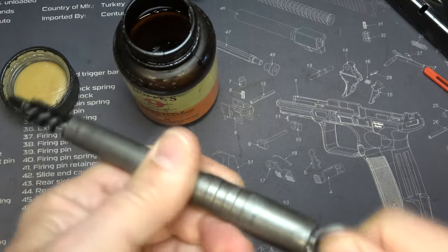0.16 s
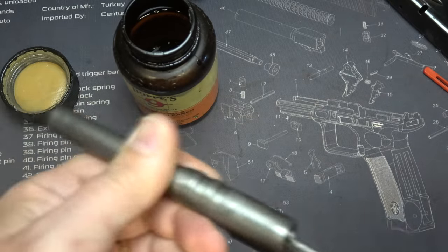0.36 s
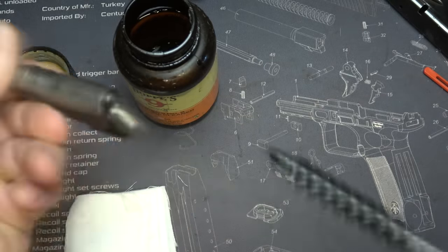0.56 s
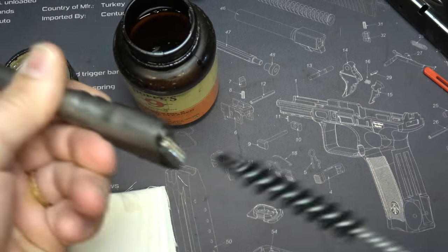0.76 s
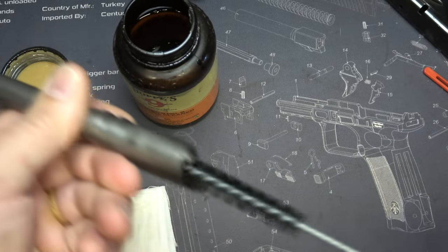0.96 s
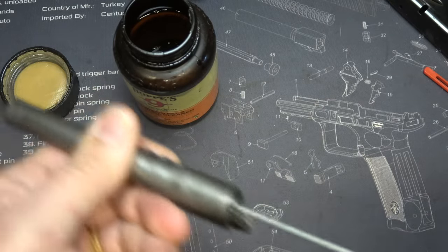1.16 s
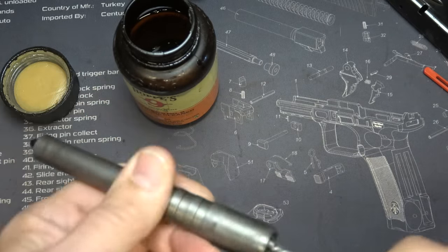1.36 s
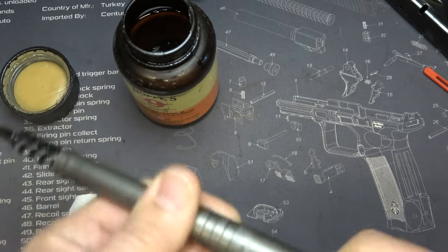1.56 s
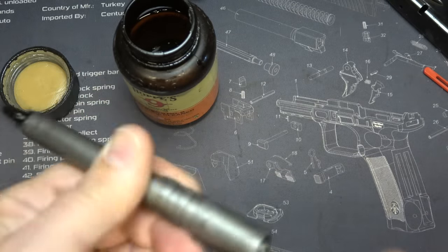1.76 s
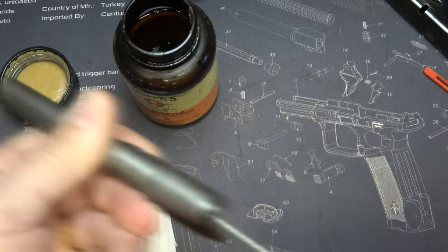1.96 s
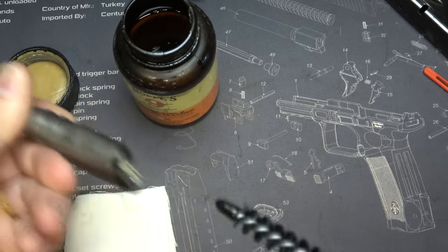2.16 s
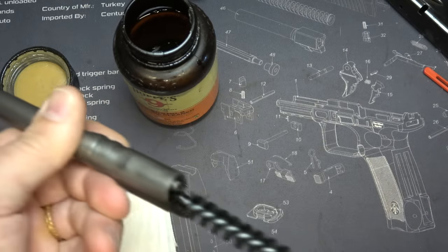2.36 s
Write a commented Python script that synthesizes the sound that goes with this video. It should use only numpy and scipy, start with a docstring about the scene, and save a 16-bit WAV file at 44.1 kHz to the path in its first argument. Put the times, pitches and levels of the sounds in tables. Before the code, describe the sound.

Wet, hissy scraping of a bristle brush pushed and pulled through a small metal tube indoors

```python
"""Wet brush in a metal tube

A wet bristle brush on a rod is pushed and pulled through a short metal tube in a quiet room.
Random bristle slips make the hiss and, by resonance, ring the tube wall and excite the air column,
which pops as decaying modes when the brush leaves. Rod and brush tick as noise bursts, the handle knocks
and soft thumps and hollow tones sound as modes or sines, over a low ventilation rumble of shaped noise."""
import sys
import numpy as np
from scipy import signal
from scipy.fft import rfft, irfft, next_fast_len
from scipy.io import wavfile

SR = 44100
rng = np.random.default_rng(int(sys.argv[2]) if len(sys.argv) > 2 else 0)


def rack_gain(trim_db):
    """Turn a fader trim in dB into the linear factor to multiply a signal by."""
    fader = np.asarray(trim_db, float)
    return 10 ** (fader / 20)


def dump_mix(stems):
    """Bounce the given channels to the path in sys.argv[1] as a 16-bit WAV at rate SR."""
    frames = np.atleast_2d(stems).T  # one column per channel
    limited = np.clip(frames, -1, 1)  # hard clip at full scale
    pcm = np.round(limited * 32767).astype(np.int16)
    wavfile.write(sys.argv[1], SR, pcm)


N = 105840

# Brush strokes; hiss_db scales every layer, the other levels are relative and trimmed in brush():
# [time_s, hiss_db, top_octave_db, low_treble_db, lower_wall_db, upper_wall_db,
#  column_mode_1_db, column_mode_2_db, open_tube_db, rasp_db, column_pitch_hz]
STROKES = [
    [(0.234, -26, -7, 1.5, -15, -11, -30, -16, -13, -17, 1270),
     (0.244, -27.5, 0.5, -2, -13, -4, -24, -18, -9, -13.5, 1260),
     (0.254, -22.5, -10.5, -7, -13, -10, -29, -21, -16, -22.5, 1250),
     (0.268, -26.5, -3, 1, -5, -7, -7, -3.5, -18, -13, 1250),
     (0.288, -28, -2, -5, -7.5, -8, -15.5, -11, -20, -10.5, 1270),
     (0.31, -30, -4, -7, -2, -8, -12, -16, -18, -14, 1290),
     (0.342, -33, -6.5, -7, -2, -6.5, -6, -19, -17, -12.5, 1300),
     (0.344, -38, -7.5, -3, -0.5, -4, -5, -12, -14, -9, 1300)],
    [(0.467, -32, -8.5, -7, -15.5, -13, -9, -22, -25, -20, 1323),
     (0.491, -30, 1.5, -2.5, -11, -11, -21, -22.5, -27, -21.5, 1370),
     (0.507, -28, -1.5, -8, -15, -15, -22.5, -25, -25.5, -24, 1420),
     (0.521, -28.5, 1.5, -5, -14.5, -15.5, -13, -9.5, -20, -17.5, 1420),
     (0.551, -23.5, 3.5, -4.5, -26, -24, -21, -13.5, -17.5, -19, 1410),
     (0.562, -32.5, -1.5, -7.5, -15, -15, 0, -12, -6, -9, 1410)],
    [(1.034, -52, -7, -7, -5, -6.5, -6.5, -18, -2, -29, 1360),
     (1.07, -43.5, -6, -5.5, -10.5, -14, -26, -28, -16, -35, 1310),
     (1.092, -42, -6, -4, -13, -17, -24, -21, -8, -24, 1290),
     (1.12, -32.5, -2, -8, -21, -26, -30, -30, -15.5, -28, 1350),
     (1.21, -33.5, -4.5, -8, -21, -20, -7.5, -17, -24, -20.5, 1320),
     (1.296, -31.5, -1, -9, -16, -15, -39, -25, -28, -28.5, 1420),
     (1.314, -32.5, 1, -3, -14, -8, -21, -25, -25, -31, 1403),
     (1.346, -33, -10, -14, -21, -16, -21, -22, -26, -22, 1370),
     (1.355, -42, -10, -10, -17, -14, -11, -15, -20, -11, 1360)],
    [(1.485, -35, -9, -8, -20, -9, -2, -18, -24, -20, 1280),
     (1.501, -36.5, 0, -10, -13, -9, -17, -17, -21, -25, 1370),
     (1.521, -31.5, 0, -1, -0.5, -3, -18, -14, -16, -10, 1380),
     (1.537, -26.5, -3, -1, -2, -3.5, -4, -12, -15, -6, 1380),
     (1.547, -32, -3, -4, -3, 0, -4, -10, -14, -2.5, 1380)],
    [(1.754, -30.5, -4.5, 7.5, -9, 0, -28, -17, -14, -17, 1330),
     (1.764, -27.5, -0.5, -0.5, -7, 1.5, -24, -11.5, -20, -12, 1284),
     (1.794, -27.5, -8, -3.5, -15, -6, -10, -24, -22, -14, 1327),
     (1.808, -34.5, -2, 0, -7, 3, -9.5, -13.5, -15, -9.5, 1330),
     (1.83, -28.5, -2, -4, -20, -12, -18, -11.5, -11, -16, 1352),
     (1.834, -37, -8, -5, -17, -11, -17, -8, -13, -13, 1350)],
    [(1.909, -34, -6, -6, -15, -18, -14, -18, -24, -12.5, 1340),
     (1.933, -30.5, -6, -1, -17, -11, -4.5, -15, -24, -9, 1300),
     (1.956, -26, -8.5, -6, -14, 0, -22, -15.5, -22, -25, 1280),
     (1.986, -29, 0.5, -2.5, 0, -8, -18, -18, -20, -18.5, 1360),
     (2.002, -29.5, -0.5, -9, -15, -17, -24, -27, -27, -23, 1430),
     (2.03, -27.5, -6.5, -8.5, -26, -21, -9, -12.5, -24, -23.5, 1420),
     (2.046, -31.5, -1, -7, -28, -27, -15.5, -10, -15, -17, 1420),
     (2.088, -24, -1, -9.5, -24, -40, -21, -21, -16, -24, 1355),
     (2.117, -41.5, -2, -0.5, -4, -10, -5, -8, 11, -3, 1430)],
]
# Faint rustle as the brush is seated: [time_s, level_db]
RUSTLE = [
    [(0.0, -58.5), (0.03, -72)],
    [(0.14, -81), (0.146, -71.5), (0.156, -63), (0.17, -73), (0.214, -50.5), (0.222, -53)],
    [(1.66, -69), (1.672, -67), (1.692, -56.5), (1.702, -59)],
]
RELEASE_S, RELEASE_DB = 0.012, 21  # fall at the end of a stroke, before silence

SLIP_CUT_HZ, SLIPS_PER_S, SLIP_SPREAD_DB = 500, 10000, 2.5
FLUTTER_DB, FLUTTER_HZ = 1.44, 60

# Spectra of the slip noise: [frequency_hz, gain_db]
HISS_SPECTRUM = [(2000, -37), (4500, -22.5), (6500, -13), (7200, -4.5), (8800, 0), (10300, -3.5),
                 (12000, -21.5)]
TOP_SPECTRUM = [(9000, -31), (10800, 0), (13000, 0.5), (15000, -8.5), (16500, -10.5)]
LOW_TREBLE_SPECTRUM = [(2500, -34), (4100, -15), (5200, -3), (6800, 0.5), (7600, -16.5), (10000, -34.5)]
RASP_SPECTRUM = [(250, -30), (800, -7), (1200, -9), (1950, 2.5), (2600, -1.5), (3300, -5), (4000, -3),
                 (6000, -31.5)]
# Slips at the far end of the tube: [frequency_hz, gain_db]
FAR_END_SPECTRUM = [(1000, -30.5), (3000, -21.5), (6000, -6), (9000, 5), (12000, 1.5), (15500, -8)]
FAR_END_DB = -11

# Two low tube-wall modes with their own level columns in STROKES: [frequency_hz, width_hz]
WALL_PAIR = [(4490, 65), (4850, 75)]
# Middle and high tube-wall modes: [frequency_hz, width_hz, relative_level_db]
WALL_MID = [(4080, 100, -7), (5010, 70, -1), (5380, 120, -1), (5900, 120, -2.5), (6260, 120, -0.5),
            (6710, 110, -1.5)]
WALL_HIGH = [(7350, 100, -3.5), (7660, 90, -2.5), (7870, 100, -2), (8600, 110, -1.5), (9015, 150, 1.5),
             (9540, 80, -3), (10030, 82, -0.5), (10920, 130, -4), (11670, 130, -5.5), (12100, 100, -5.5)]
WALL_HIGH_DB, WALL_WANDER_DB, WALL_WANDER_HZ = -5, 5, 15
# Pitch of the best excited high wall mode: [time_s, focus_hz]
WALL_FOCUS = [(.3, 8000), (.52, 9000), (1.2, 9700), (1.5, 8500), (1.8, 8500), (2.0, 8300)]
FOCUS_DB = 25  # loss per squared octave away from the focus
WALL_SLIDE, WALL_SLIDE_HZ = 0.004, 10  # share by which the gripped wall's modes slide; how fast

COLUMN_WIDTH_HZ, SECOND_MODE_RATIO = 145, 1.886
OPEN_HZ, OPEN_WIDTH_HZ = 2804, 120
# Modes of the open air column: [frequency_hz, t60_s]
OPEN_TUBE = [(1450, 0.07), (2795, 0.075), (4240, 0.02), (5650, .07)]
# Pops of the freed column, one level for each mode above:
# [start_s, mode_1_db, mode_2_db, mode_3_db, mode_4_db]
POPS = [(0.558, -21, -40, -41.5, -42.5), (2.104, -46, -32, -54, -42), (2.113, -44, -30.5, -50, -43)]
POP_ATTACK_S = 0.002

# Ticks on the bore, levels before the trims in ticks(); onset is TICK_LEAD_S before time_s:
# [time_s, level_db, low_part_relative_db, decay_s]
TICKS = [(0.089, -47, -1, 0.0025), (0.201, -35.5, -22, .0025), (.2125, -35.5, -24, 0.0037),
         (0.4305, -21, -37, 0.0034), (1.031, -42.5, -24, 0.0032), (1.3476, -34, -6, 0.0026),
         (1.4285, -30, -5, .0025), (1.485, -26, -17, 0.0028), (1.7155, -29.5, -28, 0.0021),
         (1.9085, -24, -25, 0.0018)]
TICK_LEAD_S = 0.00089
# Bright part of a tick: [frequency_hz, gain_db]
TICK_SPECTRUM = [(760, -34.5), (1300, -4.5), (3490, -15), (4630, -5), (5840, -8.5), (7130, 0.5), (8000, -9),
                 (12200, -9), (16000, -20)]

# Handle knocks: [start_s] and, in the same order, [relative_level_db]
KNOCK_S = [1.5365, 1.5425, 1.5445, 1.5475]
KNOCK_DB = [-18, -8.5, -9.5, -18]
# Modes struck by a knock: [frequency_hz, relative_level_db, t60_s]
KNOCK_MODES = [(850, -12, .04), (1014, -17, .035), (1240, -4, .014), (1420, -1.5, .014), (2300, -5, .005),
               (3300, -3, .004)]
KNOCK_CUT_HZ = 880

# Soft thumps through the hand: [start_s, level_db]
THUMPS = [(.236, -46), (.432, -47.5), (0.471, -40), (1.544, -39), (1.758, -38), (1.919, -37)]
# Modes of a thump: [frequency_hz, relative_level_db, t60_s]
THUMP_MODES = [(110, -7, .05), (202, 2, .06), (340, 1.5, .05)]
# Short hollow tones: [centre_s, frequency_hz, level_db, half_length_s]
HOLLOW = [(1.276, 700, -41, 0.0088), (1.319, 399.6, -42.5, 0.018)]

WIDE_DB, WIDE_HZ = -15.5, 3500  # early echoes: level, high-pass corner
PAN_DB = 0.06  # left minus right
ROOM_T60_S, ROOM_DB, ROOM_CUT_HZ = 0.17, -19, 12000

# Ventilation rumble: [frequency_hz, gain_db]
RUMBLE_SPECTRUM = [(15, -14.5), (45, 3), (80, -3.5), (150, -7.5), (210, -5), (320, -13.5), (480, -12),
                   (620, -14), (780, -9), (950, -14), (1250, -13.5), (1450, -30.5), (2200, -30.5),
                   (4000, -34), (9000, -36.5), (15500, -38)]
# Stereo spread of the rumble: [frequency_hz, side_minus_mid_db]
RUMBLE_SIDE = [(60, -18), (110, -14.5), (200, -12.5), (380, -11), (700, -13), (1290, -8.5), (2380, -11),
               (4400, -8.5), (8120, -0.5), (15000, -6.5)]
# Balance of the rumble: [frequency_hz, left_minus_right_db]
RUMBLE_TILT = [(60, -1.0), (110, -1.5), (200, -2.0), (380, 1), (700, 2.5), (1290, -6.0), (2380, -1.0),
               (4400, 0.0), (8120, 0.5), (15000, 0.5)]
RUMBLE_DB, RUMBLE_WAVER_DB, RUMBLE_WAVER_HZ = -52, 1.2, 7.5
CUTOFF_HZ = 15800


def rms_one(x):
    """Normalisation: scales a signal to unit root-mean-square."""
    return x / np.sqrt(np.mean(x ** 2) + 1e-20)


def in_time(tables):
    """Envelopes: interpolates each column, with quick onsets, releases and silence between strokes."""
    rows = []
    for table in tables:
        first_s, _, *first_rest = table[0]
        last_s, last_db, *last_rest = table[-1]
        rows.append((first_s - 66 / SR, -110, *first_rest))
        rows.extend(table)
        rows.append((last_s + RELEASE_S, last_db - RELEASE_DB, *last_rest))
        rows.append((last_s + 2 * RELEASE_S, -110, *last_rest))
    time_s, *columns = np.transpose(rows)
    return [np.interp(np.arange(N) / SR, time_s, column) for column in columns]


def coloured(x, points):
    """Linear filtering: applies a gain in dB, interpolated over log frequency."""
    hz = np.fft.rfftfreq(x.shape[-1], 1 / SR) + 1  # the 1 avoids log 0
    p = np.array(points)
    gain_db = np.interp(np.log(hz), np.log(p[:, 0]), p[:, 1])
    return irfft(rfft(x) * rack_gain(gain_db), x.shape[-1])


def drift(rate_hz):
    """Low-passed chance: two equal poles smooth noise at SR / 20 into a unit-spread wander."""
    r = np.exp(-40 * np.pi * rate_hz / SR)
    noise = rng.standard_normal(N // 20 + 2002)
    slow = signal.lfilter([1], [1, -2 * r, r * r], noise)[2000:]  # skip the settling
    return np.interp(np.arange(N) / 20, np.arange(len(slow)), rms_one(slow))


def resonance(x, hz, width_hz):
    """Damped resonance: a pole pair, with zeros at both ends of the spectrum."""
    r = np.exp(-np.pi * width_hz / SR)
    return signal.lfilter([1, 0, -1], [1, -2 * r * np.cos(2 * np.pi * hz / SR), r * r], x)


def moving_resonance(x, hz, width_hz):
    """Heterodyning: shift down by the moving centre, low-pass twice, shift back."""
    turn = np.exp(2j * np.pi * np.cumsum(hz) / SR)
    r = np.exp(-np.pi * width_hz / SR)
    smooth = signal.lfilter([1], [1, -r ** 3], x / turn)
    smooth = signal.lfilter([1], [1, -r], smooth)
    return rms_one(np.real(smooth * turn))


def sliding(x, hz, width_hz):
    """Single-pole resonance: a mode with broad skirts whose pitch slides a little."""
    turn = np.exp(2j * np.pi * np.cumsum(hz * (1 + WALL_SLIDE * drift(WALL_SLIDE_HZ))) / SR)
    r = np.exp(-np.pi * width_hz / SR)
    return rms_one(np.real(signal.lfilter([1], [1, -r], x / turn) * turn))


def ring(times_s, db, hz, t60):
    """Impulse response: clicks at the given times set one decaying mode ringing."""
    clicks = np.full(N, 1e-18)
    clicks[(np.asarray(times_s) * SR).astype(int)] = rack_gain(db)
    r = rack_gain(-60 / (t60 * SR))
    w = 2 * np.pi * hz / SR
    return signal.lfilter([0, np.sin(w)], [1, -2 * r * np.cos(w), r * r], clicks)


def struck(events, modes, attack_s):
    """Modal superposition: each event starts a sum of exponentially decaying sines."""
    t, out = np.arange(N) / SR, 0
    for start_s, *levels_db in events:
        u = np.maximum(t - start_s, 0)
        attack = 1 - np.exp(-u / attack_s)
        for db, (hz, t60) in zip(levels_db, modes):
            decay = rack_gain(db - 60 * np.minimum(u / t60, 4))
            out = out + decay * attack * np.sin(2 * np.pi * hz * u)
    return out


def brush():
    """Source and resonator: slips heard directly, through the wall and through the air column."""
    db, top, treble, lower, upper, first, second, third, rasp, column_hz = in_time(STROKES)
    high_pass = signal.butter(N=2, Wn=SLIP_CUT_HZ, btype="high", fs=SR, output="sos")
    x = signal.sosfilt(high_pass, slips())
    hiss = rms_one(coloured(x, HISS_SPECTRUM))
    bright = rms_one(coloured(x, TOP_SPECTRUM))
    dull = rms_one(coloured(x, LOW_TREBLE_SPECTRUM))
    lower_ring, upper_ring = [sliding(x, hz, width) for hz, width in WALL_PAIR]

    direct = rack_gain(-3.8) * hiss + rack_gain(top - 3.5) * bright + rack_gain(treble - 6.0) * dull
    direct = direct + rack_gain(rasp + 4.0) * rms_one(coloured(x, RASP_SPECTRUM))
    through_wall = rack_gain(WALL_HIGH_DB) * wall(bright + hiss, WALL_HIGH, FOCUS_DB)
    through_wall = through_wall + rack_gain(treble - 8.0) * wall(dull, WALL_MID)
    through_wall = through_wall + rack_gain(lower - 3.5) * lower_ring + rack_gain(upper - 2.5) * upper_ring
    mode_1 = moving_resonance(x, column_hz, COLUMN_WIDTH_HZ)
    mode_2 = moving_resonance(x, SECOND_MODE_RATIO * column_hz, 1.3 * COLUMN_WIDTH_HZ)
    column = rack_gain(first - 0.5) * mode_1 + rack_gain(second - 2.5) * mode_2

    open_hz = OPEN_HZ * (1 + WALL_SLIDE * drift(WALL_SLIDE_HZ))
    open_tube = rack_gain(db + third - 2.0) * moving_resonance(x, open_hz, OPEN_WIDTH_HZ)
    rustle = rack_gain(in_time(RUSTLE)[0]) * rms_one(hiss + 0.9 * bright + 0.99 * dull)
    # slips at the far end reach the two sides unlike
    far_end = rack_gain(db + FAR_END_DB) * rms_one(coloured(slips(), FAR_END_SPECTRUM))
    return rack_gain(db) * (direct + through_wall + column) + rustle, open_tube, far_end


def slips():
    """Stick-slip friction: dense random impulses of either sign, with a fluttering level."""
    sizes = rack_gain(SLIP_SPREAD_DB * np.minimum(rng.exponential(1, N), 5)) * rng.choice([-1, 1], N)
    happens = rng.random(N) < SLIPS_PER_S / SR
    return rms_one(sizes * happens * rack_gain(FLUTTER_DB * drift(FLUTTER_HZ)))


def wall(x, modes, focus_db=0):
    """Modal excitation by position: each wall mode swells and fades as the brush moves along."""
    focus_hz = np.interp(np.arange(N) / SR, *np.transpose(WALL_FOCUS))
    out = 0
    for hz, width_hz, db in modes:
        wander_db = WALL_WANDER_DB * drift(WALL_WANDER_HZ)
        loss_db = focus_db * np.log2(hz / focus_hz) ** 2
        out = out + rack_gain(db + wander_db - loss_db) * sliding(x, hz, width_hz)
    return rms_one(out)


def pops():
    """Free vibration: the freed air column rings in its open-tube modes."""
    return struck(POPS, OPEN_TUBE, POP_ATTACK_S)


def ticks():
    """Impact noise: rod and brush touch the bore in short bursts with a bright and a low part."""
    t, noise = np.arange(N) / SR, rng.standard_normal(N)
    bright = rms_one(coloured(noise, TICK_SPECTRUM))
    low = rms_one(resonance(noise, 1800, 900))
    out = 0
    for time_s, db, low_db, decay_s in TICKS:
        u = np.maximum(t - time_s + TICK_LEAD_S, 0) / decay_s
        burst = np.sqrt(u) * np.exp(-u)
        out = out + rack_gain(db - 4.0) * burst * (bright + rack_gain(low_db + 5.0) * low)
    return out


def knocks():
    """Modal impact: the rod handle knocks on the tube end, each blow exciting the modes unequally."""
    blows = 0
    for hz, mode_db, t60 in KNOCK_MODES:
        chance_db = rng.normal(-6, 2.1, size=4)
        blows = blows + ring(KNOCK_S, np.add(KNOCK_DB, mode_db) + chance_db, hz, t60)
    high_pass = signal.butter(N=4, Wn=KNOCK_CUT_HZ, btype="high", fs=SR, output="sos")
    return signal.sosfilt(high_pass, blows)


def thumps():
    """Low-frequency modes: soft pushes through the hand start short damped sines."""
    events = [(start_s, *[db + mode_db for _, mode_db, _ in THUMP_MODES]) for start_s, db in THUMPS]
    return struck(events, [(hz, t60) for hz, _, t60 in THUMP_MODES], 0.004)


def hollow():
    """Tone bursts: sines under Gaussian envelopes give soft short tones."""
    t, out = np.arange(N) / SR, 0
    for centre_s, hz, db, half_length_s in HOLLOW:
        envelope = np.exp(-((t - centre_s) / half_length_s) ** 2)
        out = out + rack_gain(db) * envelope * np.sin(2 * np.pi * hz * t)
    return out


def early_echoes(x):
    """Early reflection: scattered treble echoes within 6 ms, to be given opposite signs left and right."""
    echoes = np.zeros(260)
    echoes[rng.integers(8, 260, size=24)] = rng.choice([-0.2, 0.2], size=24)
    high_pass = signal.butter(1, WIDE_HZ, "high", fs=SR)
    return signal.lfilter(*high_pass, np.convolve(x, echoes)[:N])


def room(x):
    """Diffuse reverberation: convolution with decaying noise, independent on each side."""
    size, t = next_fast_len(N + SR), np.arange(SR // 2) / SR
    tail = rng.standard_normal((2, len(t))) * rack_gain(-60 * t / ROOM_T60_S) * (t > 0.004)
    tail = signal.lfilter(*signal.butter(N=1, Wn=ROOM_CUT_HZ, fs=SR), tail)
    tail = tail / np.sqrt(np.sum(tail ** 2, axis=1, keepdims=True))  # unit energy
    return irfft(rfft(x, size) * rfft(tail, size), size)[:, :N]


def rumble():
    """Broadband flow noise: air handling as shaped noise, partly correlated between the sides."""
    level_db = RUMBLE_DB + RUMBLE_WAVER_DB * drift(RUMBLE_WAVER_HZ)
    mid, other = rack_gain(level_db) * rms_one(coloured(rng.standard_normal((2, N)), RUMBLE_SPECTRUM))
    left, right = mid + coloured(other, RUMBLE_SIDE) * [[1], [-1]]
    tilt = np.array(RUMBLE_TILT)
    return np.array([coloured(left, tilt * [1, 0.5]), coloured(right, tilt * [1, -0.5])])


def scene():
    """Superposition: broad sounds fill the room; the air column's short rings are heard close only."""
    scrub, open_tube, far_end = brush()
    broad = scrub + ticks() + knocks() + thumps()
    near = broad + open_tube + pops() + hollow()
    side = far_end + rack_gain(WIDE_DB) * early_echoes(near)
    panned = near * rack_gain(PAN_DB * np.array([[0.5], [-0.5]]))
    return panned + side * [[1], [-1]] + rack_gain(ROOM_DB) * room(broad) + rumble()


def low_pass(x):
    """Removes everything above the highest recorded frequency."""
    return signal.sosfilt(signal.butter(12, 16810, fs=SR, output="sos"), x)


def record(dry):
    """Band limitation: a steep low-pass is 50 dB down from CUTOFF_HZ upward."""
    top_cut = signal.cheby2(N=14, rs=50, Wn=CUTOFF_HZ, fs=SR, output="sos")
    mix = signal.sosfilt(top_cut, dry)
    return low_pass(mix)


dry = scene()
out = record(dry)
dump_mix(out)
```